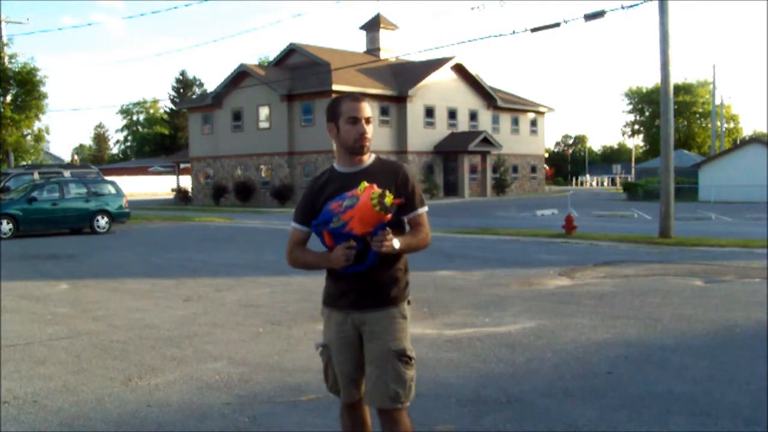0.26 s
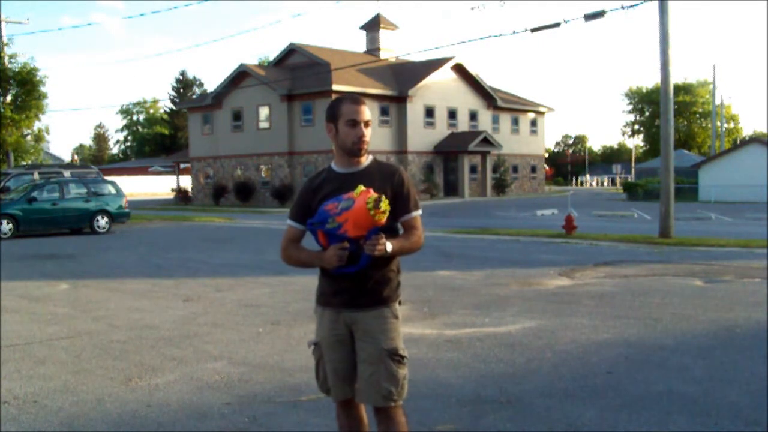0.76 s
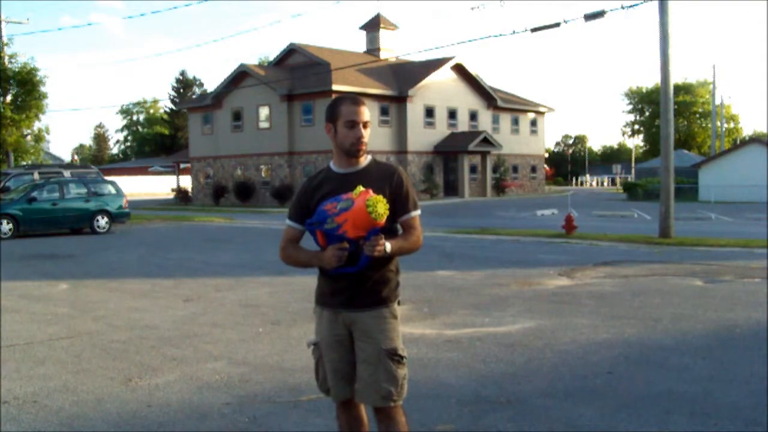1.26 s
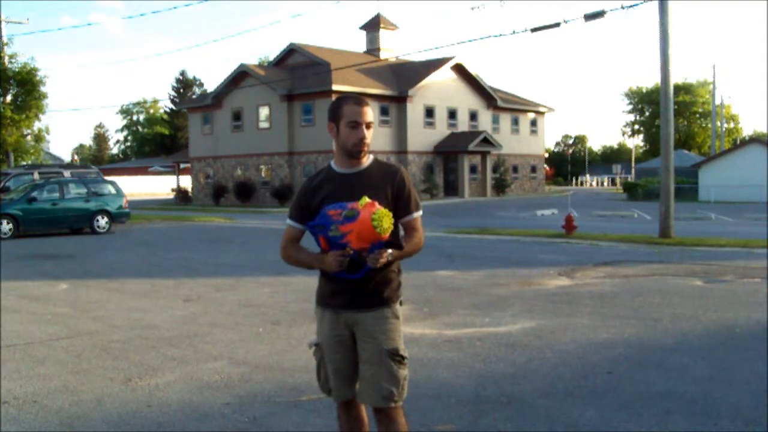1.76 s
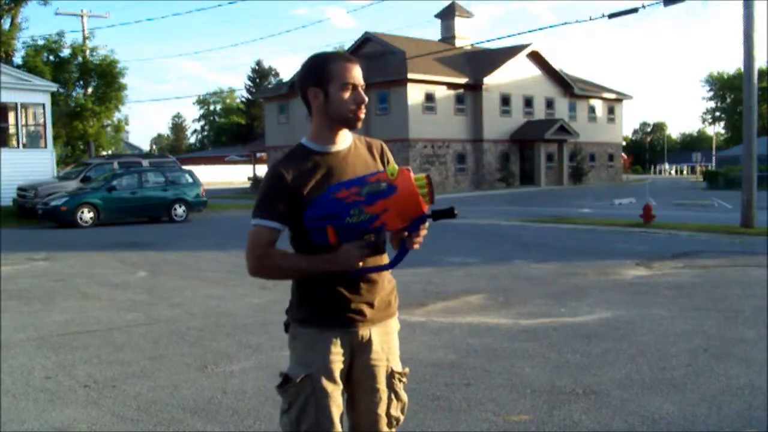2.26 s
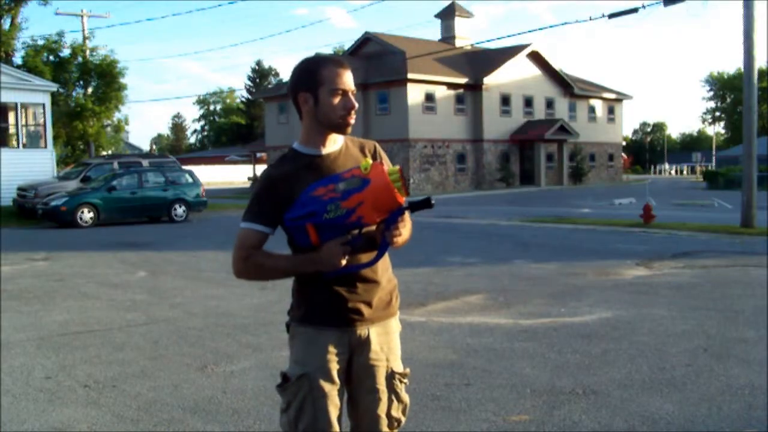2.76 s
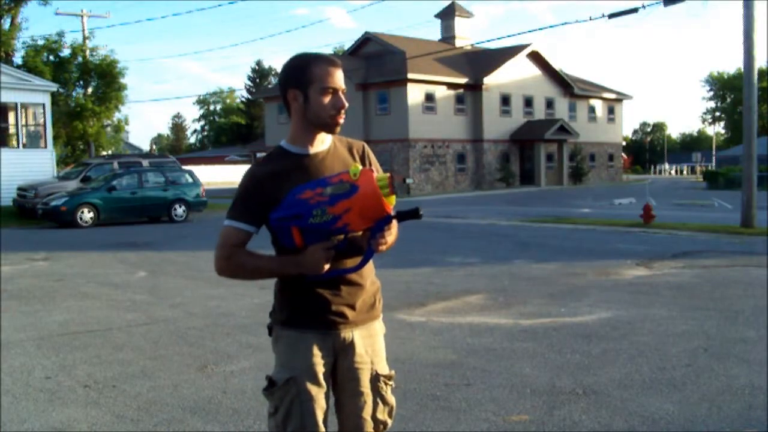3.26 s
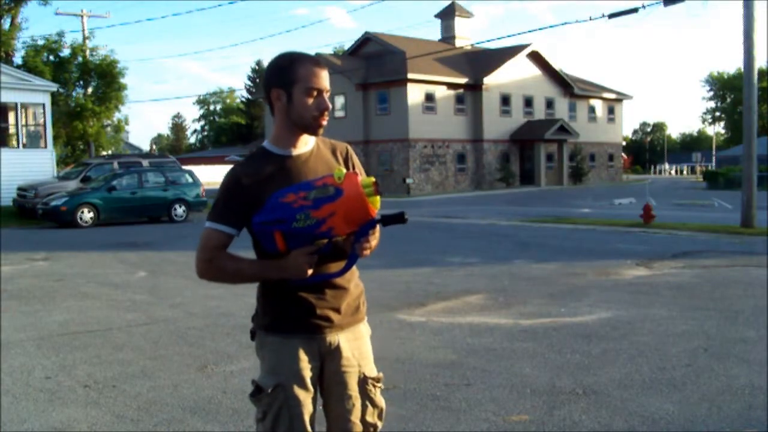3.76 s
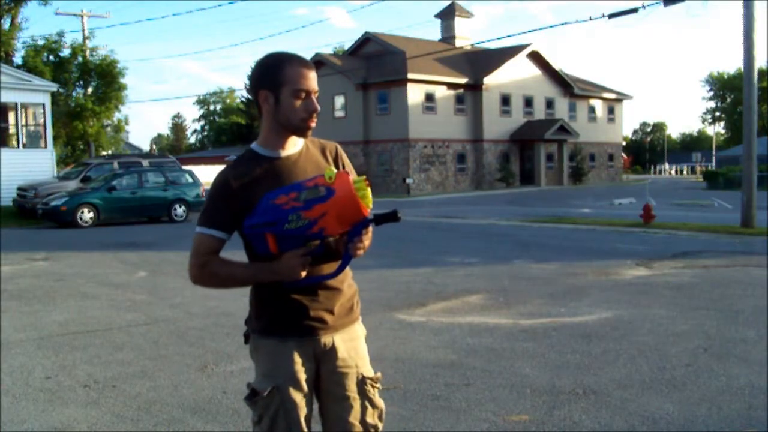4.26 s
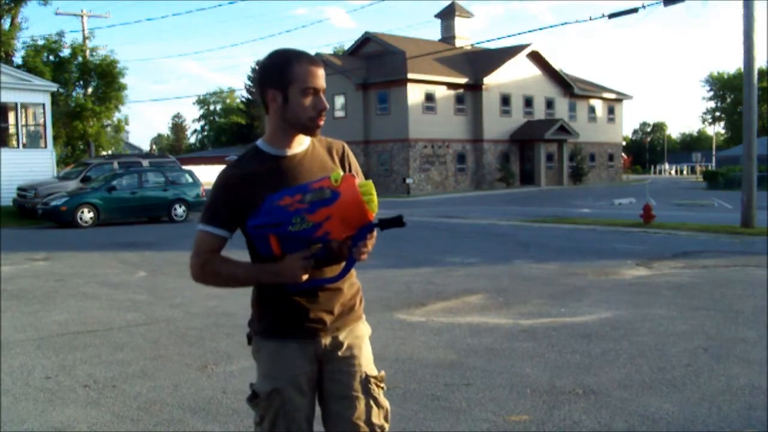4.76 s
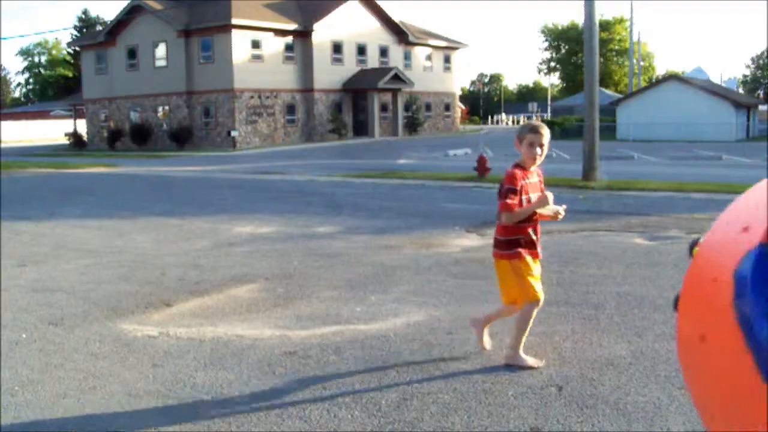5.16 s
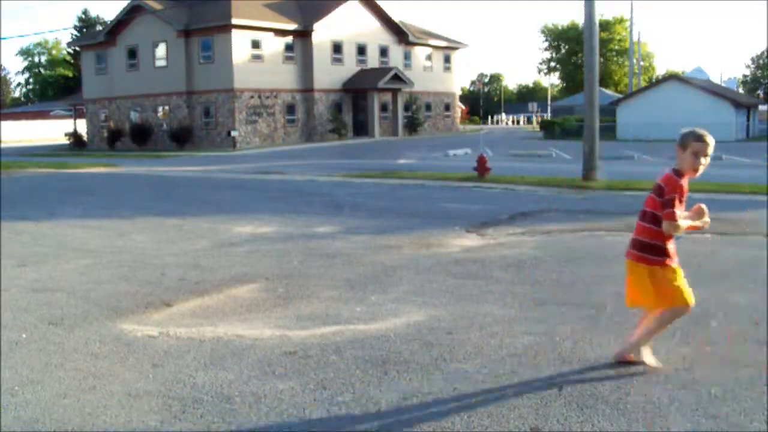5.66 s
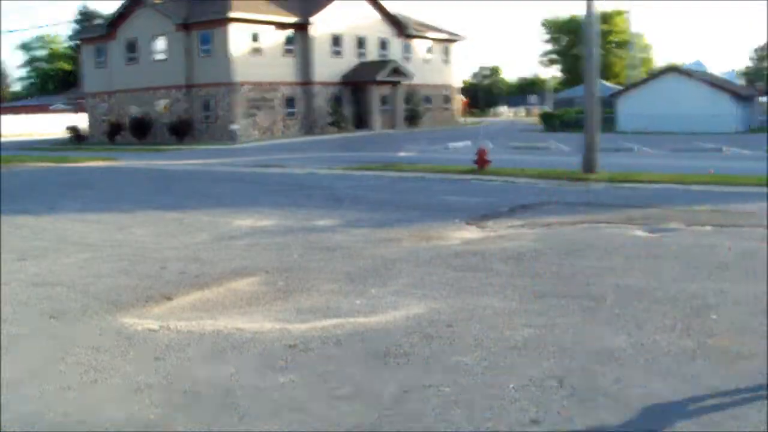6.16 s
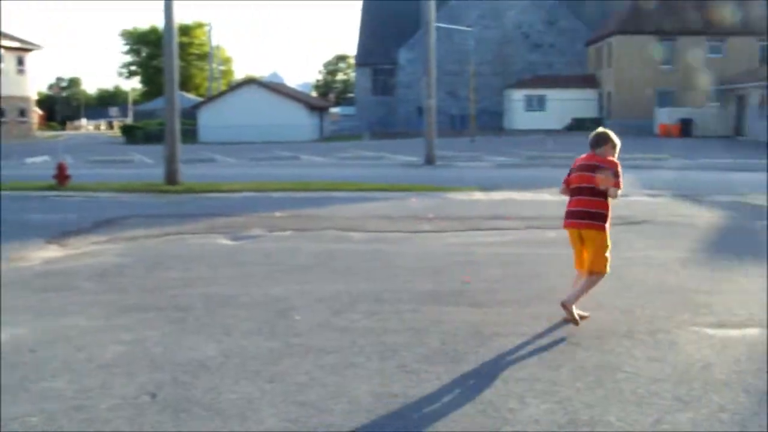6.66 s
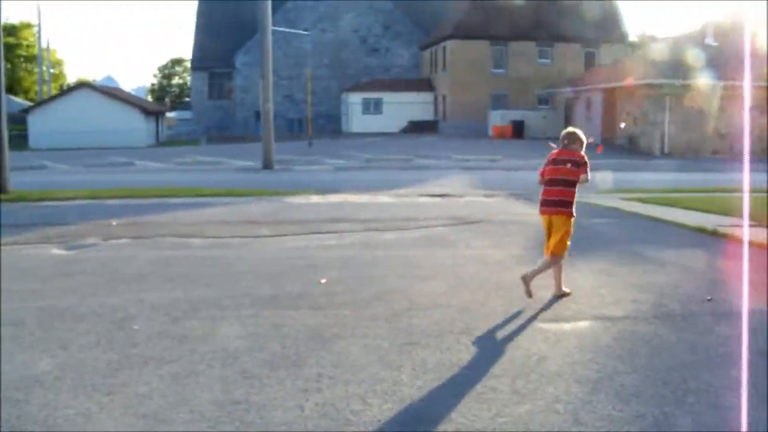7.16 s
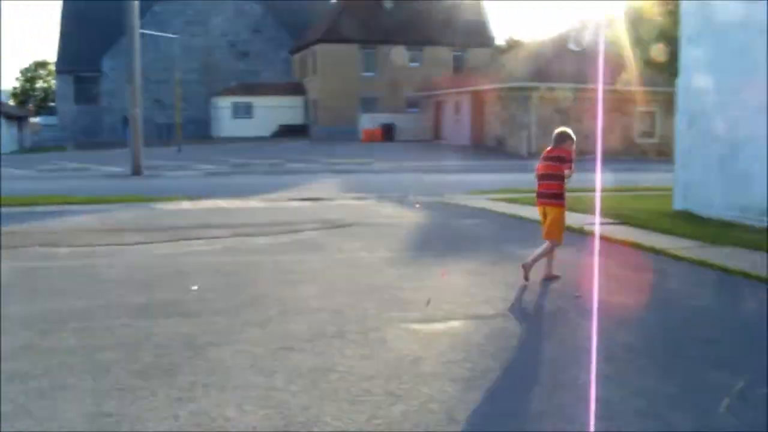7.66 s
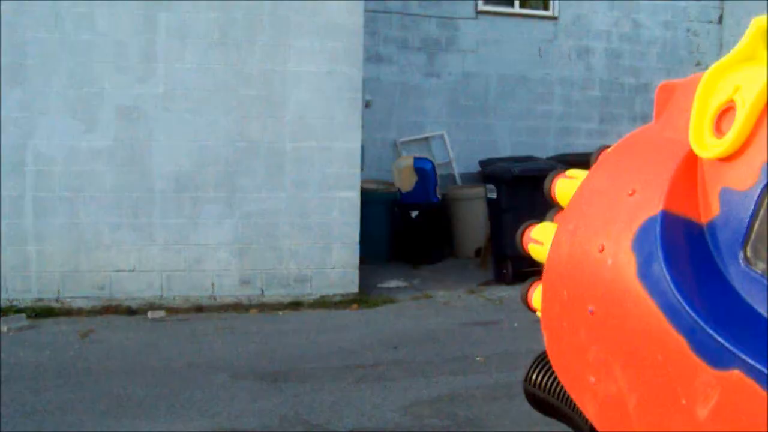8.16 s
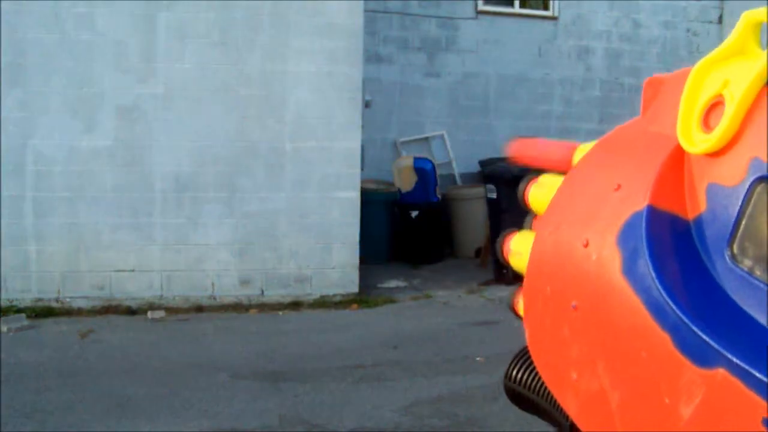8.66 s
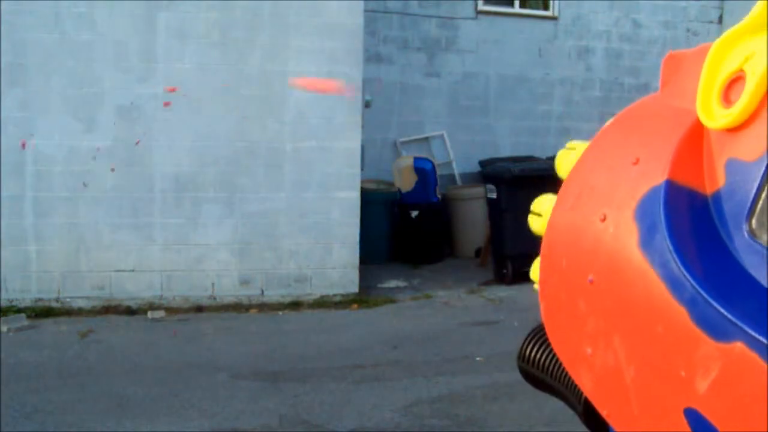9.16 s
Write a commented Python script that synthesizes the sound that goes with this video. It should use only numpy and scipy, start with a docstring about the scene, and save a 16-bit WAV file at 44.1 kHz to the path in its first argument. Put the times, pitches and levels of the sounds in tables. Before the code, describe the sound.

Outdoors in a parking lot, a motorized toy dart blaster starts almost at once with a click and a long rattling burst of about twenty shots until 1.4 s, slowing from roughly nineteen to fourteen per second. Each shot is a plastic slam, hollow barrel pop and latch clack. Echoes fade with a sharp tap at 1.6 s. At 2.1 s the position jumps closer; fifteen shots run from 2.6 to 3.4 s, then taps, three shots at 4.0 and two at 4.4 s. From 5.1 s the blaster is beside the microphone: short bursts at 5.7, 6.7 and 7.7 s, with low thumps, scuffs and ticks between, while a distant engine hum rises in pitch. At 8.2 s the view cuts to a wall and the hum drops; a final fourteen-shot burst from 8.65 to 9.35 s slaps back quickly. Air hiss throughout; loud shots distort on the small microphone.

```python
"""A motorized toy dart blaster fires eight rattling bursts in a parking lot, heard from four positions in turn.
Each shot is a slam of plastic parts, a hollow pop from the barrel, then a latch clack; the rate sags as a burst goes on.
Shaped noise makes the impacts: knocks through resonances of shell, latch and linkage, with taps of landing darts
and scuffs of hands. Scattered echoes and a facade slap return the clatter; wavering tones make a far engine's hum
under a hiss of air, and the small microphone overloads."""
import sys
import numpy as np
from scipy import signal
from scipy.fft import rfft, irfft, next_fast_len
from scipy.io import wavfile
from scipy.ndimage import uniform_filter1d

SR = 44100
rng = np.random.default_rng(int(sys.argv[2]) if len(sys.argv) > 2 else 0)


def generate_wav(signal):
    """Clip the signal to [-1, 1] and save it as 16-bit WAV at the path in sys.argv[1]."""
    frames = np.transpose(np.atleast_2d(signal))
    scaled = np.clip(frames, -1, 1) * 32767
    pcm = np.round(scaled).astype(np.int16)
    wavfile.write(sys.argv[1], SR, pcm)


N = 414540
HZ = np.fft.rfftfreq(8192, 1 / SR)
TIME = np.arange(N) / SR

# start of each listening position, then the end: [start_s]
POSITION_STARTS = [0, 2.13, 5.07, 8.205, 9.5]
# one row a pull of the trigger; the gap between shots grows as the motor sags, early (bend under 1) or late (over 1):
# [first_shot_s, shots, first_gap_s, last_gap_s, bend, relative force_db, clatter_s, latch_delay_s, relative latch_db]
TRIGGER_PULLS = [(0.06, 21, 0.053, 0.074, 1.3, -1.5, 0.024, 0.041, -3.5),
                 (2.594, 15, 0.0508, 0.0638, 1.15, -1.3, 0.022, 0.038, -5.5),
                 (3.977, 3, 0.064, 0.069, 1, -3, 0.026, 0.041, -5),
                 (4.43, 2, 0.073, 0.073, 1, -1.5, 0.024, 0.04, -7),
                 (5.662, 8, 0.0442, 0.055, 0.8, -4.5, 0.028, 0.039, -9),
                 (6.659, 9, 0.0505, 0.0635, 0.8, -5.5, 0.029, 0.039, -3),
                 (7.667, 5, 0.0585, 0.0718, 1, -7.5, 0.031, 0.041, -3),
                 (8.644, 14, 0.042, 0.0613, 0.42, -4.5, 0.032, 0.037, -1)]


def gain_of(db):
    """Decibels to an amplitude factor."""
    return 10 ** (np.asarray(db) / 20)


def evened(x):
    """Scales to rms 1."""
    return x / np.sqrt(np.mean(x ** 2) + 1e-20)


def read(points, hz):
    """Reads a table on a log-frequency axis."""
    f, value = np.transpose(points)
    return np.interp(np.log(hz + 1), np.log(f + 1), value)


def add(mix, s, sound):
    """Adds a sound at time s."""
    part = mix[..., max(round(s * SR), 0):][..., :sound.shape[-1]]
    part += sound[..., :part.shape[-1]]


def panned(db):
    """Left and right gains for a level difference; positive leans left."""
    return gain_of(np.array([[db], [-db]]) / 2)


def bumps(modes):
    """The dB curve of a set of resonances or dips."""
    return sum(db / (1 + (2 * (HZ - hz) / width) ** 2) for hz, width, db in modes)


def ring(db):
    """Minimum-phase impulse response with this dB curve: the energy comes first, then rings out."""
    log_gain = np.log(gain_of(np.maximum(db, -100)))
    circle = np.r_[log_gain, log_gain[-2:0:-1]]
    return np.fft.ifft(np.exp(np.conj(signal.hilbert(circle)))).real[:4096]


def colour(x, db):
    """Filters both channels by a dB curve, keeping the power of white noise."""
    response = ring(db)
    kernel = response / np.linalg.norm(response)
    return signal.oaconvolve(x, kernel[None], axes=1)[:, :x.shape[1]]


def low_pass(x, hz, size):
    """Steep linear-phase band limit."""
    kernel = signal.firwin(size, hz, window=("kaiser", 8), fs=SR)
    return signal.oaconvolve(x, kernel[None], "same")


def strike(t, rise, decay):
    """Envelope of a small impact: a quick rise and an exponential decay."""
    return (1 - np.exp(-t / rise)) * np.exp(-t / decay)


def clatter(size, per_s, air):
    """Dense random knocks of loose plastic in a rush of air."""
    knocks = rng.standard_normal((2, size)) * (rng.random(size) < per_s / SR)
    return evened(evened(knocks) + air * rng.standard_normal((2, size)))


def wavering_band(centre_hz, width_hz, side=0.33):
    """Slow random strength and phase turn a tone into a narrow stereo band."""
    coarse = TIME[::64]
    wander = rng.standard_normal((2, len(coarse), 2)) @ [1, 1j]
    r = np.exp(-np.pi * width_hz * coarse[1])
    for _ in range(2):
        wander = signal.lfilter([1 - r], [1, -r], wander)
    turn = np.exp(2j * np.pi * np.cumsum(centre_hz * np.ones(N)) / SR)
    mid, wide = ((np.interp(TIME, coarse, part) * turn).real for part in wander)
    return evened(np.array([mid + side * wide, mid - side * wide]))


def engine(hum_db=-3, hum_width_hz=10, muffler_hz=215, roar_db=-5, roar_hz=115, roar_width_hz=90,
           rumble_db=1, rumble_hz=45, rumble_width_hz=18, rumble_pan_db=5):
    """A far engine drifts in pitch: a few wavering tones over a low roar and a deep rumble."""
    # the engine idles, later speeds up, then drops back: [time_s, pitch_hz]
    engine_pitch = [(0, 99.45), (2.2, 98.8), (3.3, 106.7), (3.9, 113), (4.4, 106), (4.9, 90.4),
                    (5.2, 96.96), (5.6, 103), (6.5, 130.9), (7.3, 153.9), (7.6, 160), (8.19, 193.4),
                    (8.23, 105), (9.4, 102)]
    # its tones: [multiple of the pitch, relative level_db]
    engine_tones = [(1, -0.5), (1.5, -3.5), (2, -9.5)]
    # one row a listening position, relative: [hum_db, roar_db, rumble_db]
    background = [(-62, -61.5, -68.5), (-40, -42, -57), (-36.5, -37.5, -33.5), (-55, -54.5, -43)]
    pitch_hz = np.interp(TIME, *np.transpose(engine_pitch))
    position = np.digitize(TIME, POSITION_STARTS) - 1
    hum_level_db, roar_level_db, rumble_level_db = np.array(background)[position].T

    def muffled(tone_hz, order=6):
        """The muffler and the distance pass only the low tones."""
        return 1 / np.sqrt(1 + (tone_hz / muffler_hz) ** (2 * order))

    hum = 0
    for multiple, tone_db in engine_tones:
        tone_hz = multiple * pitch_hz
        hum = hum + gain_of(tone_db) * muffled(tone_hz) * wavering_band(tone_hz, hum_width_hz)
    roar = wavering_band(roar_hz, roar_width_hz)
    rumble = panned(rumble_pan_db) * wavering_band(rumble_hz, rumble_width_hz)
    return (gain_of(hum_level_db + hum_db) * hum + gain_of(roar_level_db + roar_db) * roar
            + gain_of(rumble_level_db + rumble_db) * rumble)


def outdoor_air(level_db=-52.5, shared=1.028):
    """Steady outdoor noise, partly common to both channels."""
    # [frequency_hz, relative density_db per Hz]
    air_spectrum = [(15, -33), (25, -4.5), (81, 5), (178, -5), (243, -1.5), (301, -12.5), (463, -8),
                    (822, -11.5), (971, -11), (1330, -14), (6130, -25.5), (7600, -32.5), (9880, -77.5),
                    (16700, -120)]
    noise = rng.standard_normal((2, N)) + shared * rng.standard_normal(N)
    return gain_of(level_db) * colour(noise, read(air_spectrum, HZ)) / np.sqrt(2)


def clacks(level_db=-4.5, rise=0.00076, decay=0.0033077, tail_db=-17, tail_decay=0.014838,
           slack_lead_s=0.013, slack_decay_s=0.0094):
    """The linkage clicks as it takes up its slack, then snaps with a weaker rattle behind."""
    # trigger and mechanism: [snap_s, relative level_db, slack click_db relative to the snap]
    clack_events = [(0.03, 2.5, -15), (2.561, 5.5, -17.5), (3.929, 3, -16.5), (4.381, 2.5, -13.5),
                    (5.533, -12.5, -37.5), (5.596, -12.5, -32), (7.634, -17, -21), (8.565, -14.5, -39.5),
                    (8.604, -16.5, -42)]
    # ring of the trigger linkage: [frequency_hz, width_hz, lift_db]
    linkage_modes = [(699, 370, 4.5), (1573.3, 200, 2.5), (2522, 300, 3), (3189, 610, 4)]
    t, envelope = np.arange(SR // 8) / SR, np.zeros(N)
    for s, db, slack_db in clack_events:
        gain = gain_of(db + level_db)
        rattle = gain_of(tail_db) * strike(t, decay, tail_decay)
        add(envelope, s - slack_lead_s, gain * gain_of(slack_db) * strike(t, rise, slack_decay_s))
        add(envelope, s, gain * (strike(t, rise, decay) + rattle))
    return colour(envelope * rng.standard_normal((2, N)), bumps(linkage_modes))


def run_up(length_s=0.0086, level_db=-22):
    """The gears start to turn just before the first shot: a short swell of rattle."""
    envelope = np.zeros(N)
    swell = gain_of(level_db) * np.linspace(0, 1, round(length_s * SR))
    for start, *_ in TRIGGER_PULLS:
        add(envelope, start - length_s, swell)
    return envelope * clatter(N, per_s=2000, air=0.6)


def firing(first_shot_db=-1.5, build_up_shots=0.9, force_spread_db=0.9338, length_spread=0.11,
           latch_spread_s=0.003, latch_spread_db=2.5):
    """Yields every shot as (s, force dB, clatter s, latch delay s, latch dB); force builds, chance varies each."""
    for start, count, first_gap, last_gap, bend, force_db, length, delay, catch_db in TRIGGER_PULLS:
        sag = np.linspace(0, 1, round(count) - 1) ** bend
        gaps = first_gap + (last_gap - first_gap) * sag
        for k, s in enumerate(start + np.r_[0, np.cumsum(gaps)]):
            force, stretch, late, catch = rng.standard_normal(4)
            build_up_db = first_shot_db * np.exp(-k / build_up_shots)
            yield (s, force_db + build_up_db + force_spread_db * force,
                   length * np.exp(length_spread * stretch),
                   delay + latch_spread_s * late,
                   catch_db + latch_spread_db * catch)


def shots(fired, slam_db=2, rise=0.005938, hold=0.73635, decay=0.01054, gear_db=-18, gear_decay=0.052345,
          latch_db=-3, latch_decay=0.0073325, bounce_db=-10, bounce_lead=.008, shot_tone_hz=2600, shot_tone_db=4):
    """The piston slams and rattles the shell, the gears grind on, then the latch bounces and catches."""
    # ring of the latch: [frequency_hz, width_hz, lift_db]
    latch_modes = [(634.26, 1300, 11.5), (1618.2, 260, 14), (2670.9, 480, 4.5), (3150, 450, 5.5)]
    t = np.arange(SR // 6) / SR
    slam, latch = np.zeros((2, N)), np.zeros(N)
    chances = rng.standard_normal((len(fired), 3))
    for (s, force_db, length, delay, catch_db), (early, size, tone) in zip(fired, chances):
        fall = np.exp(-np.maximum(t - .002 - hold * length, 0) / decay)
        blow = np.minimum(t / rise, 1) ** 2 * fall
        gears = gain_of(gear_db) * strike(t, rise, gear_decay) * clatter(len(t), per_s=700, air=.5)
        since_bounce = np.maximum(t - delay + bounce_lead / 2 + 0.0029 * early, 0)
        bounce = gain_of(bounce_db + 2.4 * size) * strike(since_bounce, 0.00023, 0.00048)
        impacts = gain_of(force_db + slam_db) * blow + bounce
        rattle = impacts * clatter(len(t), per_s=1600, air=0.8139) + gears
        hz = shot_tone_hz * np.exp(.5 * tone)  # every shot's rattle rings with its own colour
        add(slam, s - .004, colour(rattle, bumps([(hz, 0.35 * hz, shot_tone_db)])))
        add(latch, s + delay, gain_of(catch_db + latch_db) * strike(t, 0.0041, latch_decay))
    return slam + colour(latch * clatter(N, per_s=2500, air=0.11), bumps(latch_modes))


def barrels(fired, level_db=-13.0, delay=0.019, rise=0.0024, decay=0.00888):
    """The hollow pop of each dart leaving its barrel: a noise burst through the tube's resonances."""
    # [frequency_hz, width_hz, lift_db]
    barrel_modes = [(470, 160, 11), (700, 330, 23)]
    # relative strength of the pop at each listening position: [level_db]
    muzzle_db = [-1.5, -1.5, 2.5, 4]
    t, envelope = np.arange(SR // 12) / SR, np.zeros(N)
    for s, force_db, *_ in fired:
        position_db = muzzle_db[np.digitize(s, POSITION_STARTS) - 1]
        add(envelope, s + delay, gain_of(force_db + level_db + position_db) * strike(t, rise, decay))
    return colour(envelope * rng.standard_normal((2, N)), bumps(barrel_modes))


def lot(x, clump_db=5.0):
    """Scattered echoes arrive in clumps from pavement and buildings; the treble dies first."""
    # [delay_s, relative level_db]
    echo_levels = [(0.01, 5), (0.04, -8), (0.09, -10), (0.15, -11.5), (0.2, -14.5), (0.3, -13), (0.45, -21),
                   (0.7, -25.5), (1.1, -53)]
    # extra decay by band: [frequency_hz, loss_db per s]
    echo_loss = [(150, 10.5), (600, -1), (1500, 13.5), (4000, 24), (7500, 48.5)]
    size = SR * 6 // 5
    reflections = rng.standard_normal((2, size)) * (rng.random((2, size)) < 2500 / SR)
    hz, t, z = signal.stft(reflections, SR, nperseg=256)
    clumps = evened(uniform_filter1d(rng.standard_normal(len(t)), size=4))
    level_db = np.interp(t, *np.transpose(echo_levels)) + clump_db * clumps
    z *= gain_of(level_db - t * read(echo_loss, hz)[:, None]) * (t > .005)
    tail = signal.istft(z, SR, nperseg=256)[1]
    tail /= np.linalg.norm(tail, axis=1, keepdims=True)
    return signal.oaconvolve(x, tail, axes=1)[:, :x.shape[1]]


def slap(x, delay, dull_hz=3500):
    """One duller copy thrown back by a facade."""
    late = np.pad(x, ((0, 0), (round(delay * SR), 0)))[:, :x.shape[1]]
    return signal.lfilter(*signal.butter(1, dull_hz, fs=SR), late)


def landings(fired, flight_s=0.2, flight_spread=0.35, level_db=-21, tone_hz=1000,
             spread_db=-1.5, spread_octaves=0.85):
    """Yields dart landings as (s, relative dB, tone Hz, left-right dB), if the position still holds."""
    chances = (rng.random((len(fired), 3)) - .5) * np.sqrt(12)  # uniform, deviation 1
    for (s, *_), (flight, size, tone) in zip(fired, chances):
        lands = s + flight_s * np.exp(flight_spread * flight)
        if np.digitize(lands, POSITION_STARTS) == np.digitize(s, POSITION_STARTS):
            yield lands, level_db + spread_db * size, tone_hz * 2 ** (spread_octaves * tone), 0


def taps(fired, level_db=3, cycles=4, tail_db=-19, tail_decay=0.014, lift_db=10, width=0.36, apart=1.0):
    """Small knocks, each with its own tone; the lower ones last longer."""
    # clearest taps of landing darts and handled plastic: [time_s, relative level_db, tone_hz, left_right_db]
    clear_taps = [(1.603, -3, 5238, 6), (1.742, -20, 5122, -4), (1.845, -29.5, 1047, 4),
                  (3.523, -11, 4935, -3), (3.572, -14.5, 2794, -2.5), (3.662, -16.5, 3086, 16.5),
                  (3.726, -19.5, 3003, 19.5), (3.837, -20, 801, 7), (3.858, -19.5, 1450, 7),
                  (4.248, -25.5, 651, -1.5), (4.292, -19, 1672, 2.5), (4.832, -24, 2602, 11.5),
                  (5.086, -24.5, 1759, 12.5), (6.171, -8.5, 3511, 9), (6.266, -16, 2699, -2),
                  (6.297, -19, 2598, 18), (6.404, -23, 2891, 14), (6.466, -19, 3680, 7.5),
                  (6.521, -20, 3267, 6.5), (6.572, -13, 3503, 5.5), (7.341, -16, 3006, 12.5),
                  (7.392, -18.5, 1201, -1.5), (7.415, -18.5, 4016, 2.5), (7.523, -24, 1179, 10.5),
                  (7.572, -23, 1410, 4), (8.096, -19.5, 3078, 12.5), (8.131, -18.5, 1920, 8)]
    t, out = np.arange(SR // 12) / SR, np.zeros((2, N))
    body_db = read([(100, -3), (450, 3.5), (3000, 5), (7000, 0.5), (9000, -16.0)], HZ)
    for s, db, hz, pan_db in [*clear_taps, *landings(fired)]:
        tail = gain_of(tail_db) * strike(t, 0.0094, tail_decay)
        envelope = strike(t, 0.0004353, cycles / (hz + 1500)) + tail
        grain = evened(rng.standard_normal(len(t)) + apart * rng.standard_normal((2, len(t))))
        knock = colour(envelope * grain, bumps([(hz, width * hz, lift_db)]) + body_db)
        add(out, s, gain_of(db + level_db) * panned(pan_db) * knock)
    return out


def handling(rub=0.35, lift_db=7, width=0.8, tick_decay=0.001732, ticks_per_s=130, pan_db=8):
    """Hands shift the blaster and rub its shell: a swell of soft friction dotted with small ticks."""
    # [start_s, length_s, relative level_db, tone_hz]
    scuffs = [(1.809, 0.07068, -37.5, 1057), (1.955, 0.1358, -38, 1100), (5.419, 0.08467, -40, 2561),
              (6.097, 0.30256, -28, 2669), (6.381, 0.4081, -39.5, 3294), (7.27, 0.26206, -29.5, 2230),
              (7.503, 0.2294, -39.5, 1311), (8.09, 0.11, -28, 1800)]
    out = np.zeros((2, N))
    body_db = read([(150, -5.5), (500, 3), (3000, 1), (7000, -2.5), (8500, -23)], HZ)
    for s, length, db, hz in scuffs:
        size = round(length * SR)
        slips = rng.exponential(1, size) * (rng.random(size) < ticks_per_s / SR)
        ticks = evened(signal.lfilter([1], [1, -np.exp(-1 / (tick_decay * SR))], slips))
        friction = evened(rng.standard_normal(size) + rng.standard_normal((2, size)))
        scuff = np.hanning(size) ** .5 * (rub + ticks) * friction
        tone_db = bumps([(hz, width * hz, lift_db)]) + body_db
        add(out, s, gain_of(db - 8) * panned(pan_db) * colour(scuff, tone_db))
    return out


def thumps(level_db=-2, rise=0.0028, decay=0.02526):
    """The lowest mode of the shell thumps as the drive takes up its load: a decaying sine."""
    # [start_s, pitch_hz, relative level_db]
    shell_thumps = [(5.663, 205.5, -28.5), (6.659, 211.1, -14.5), (7.671, 223.9, -14.5),
                    (8.645, 192.8, -13.5)]
    t, out = np.arange(SR // 4) / SR, np.zeros(N)
    for s, hz, db in shell_thumps:
        add(out, s, gain_of(db + level_db) * strike(t, rise, decay) * np.sin(2 * np.pi * hz * t))
    return out


def ports(x, likeness, lead, balance):
    """Turns two unrelated signals into what the two microphone ports hear."""
    size = next_fast_len(x.shape[1] + 4096)
    a, b = rfft(x, size)
    hz = np.fft.rfftfreq(size, 1 / SR)
    same, tilt_db = np.clip(read(likeness, hz), 0, 1), read(balance, hz) / 2
    right = (same * a + np.sqrt(1 - same ** 2) * b) * np.exp(-1j * read(lead, hz))
    return irfft(np.array([a * gain_of(tilt_db), right * gain_of(-tilt_db)]), size)[:, :x.shape[1]]


def scene():
    """The blaster, its echoes and the air at each listening position in turn, over the other sounds."""
    # one row a position, levels relative: [direct_db, echo_db, air_db, facade slap_delay_s, slap_db, left_right_db]
    places = [(-4, 4, 5, .19, -48, 2), (-3.5, 3.5, 6, 0.41, -53, 2.5), (0, 2, 7.5, 0.16, -24, -4),
              (2, 3.5, 5.5, 0.05, -7, 1.5)]
    # the blaster's colour from each position: [frequency_hz, relative density_db per Hz]
    far_spectrum = [(71, -35), (120, -26), (232, -14.5), (301, -7.5), (384, -3.5), (516, -6.5),
                    (613, -11.5), (853, -1.5), (980, -7), (1440, -2.5), (2140, -4.5), (2460, -2.5),
                    (6970, -3), (7600, -3.5), (9880, -44.5), (16700, -120)]
    front_spectrum = [(71, -40), (120, -29), (291, -1), (377, -0.5), (572, -6.5), (646, -2.5), (980, -4),
                      (1410, 1), (1740, -2), (2500, 0.5), (3140, -1), (3730, 0), (6390, -0.5), (7600, -3.5),
                      (9880, -57), (16700, -120)]
    held_spectrum = [(71, -30), (120, -19.5), (220, -9), (296, -2.5), (346, -8), (582, -7.5), (681, -3),
                     (853, -4), (963, -8.5), (1130, -3), (1270, -0.5), (1740, -4.5), (6500, -6),
                     (7600, -5.5), (9880, -44), (16700, -120)]
    wall_spectrum = [(71, -35), (120, -21.5), (232, -6.5), (291, -10), (346, -8.5), (525, -7), (582, -9.5),
                     (681, -3), (947, -6), (1270, -4), (2030, -5.5), (4840, -4), (6850, -5.5), (7600, -6),
                     (9880, -20), (16700, -120)]
    # stereo image, ahead of and beside the microphone; three tables each:
    # left-right likeness [frequency_hz, 0-1], lead of the left port [frequency_hz, radians], balance [frequency_hz, db]
    ahead = [
        [(60, .8), (350, .97), (800, .93), (1200, .7), (1600, .4), (2300, .5), (2900, .6), (3700, .9),
         (4300, .97), (7500, .96)],
        [(60, 0), (400, -.25), (1000, -.1), (1700, .8), (2400, .6), (3100, -.1), (7500, -.1)],
        [(60, 2.0), (100, 2.0), (170, 1.0), (300, 0.0), (510, 0.0), (860, 0.0), (1470, 0.5), (2510, 3.0),
         (4280, 1.0), (7300, -0.5)],
    ]
    beside = [
        [(150, 0.8442), (700, 0.7733), (1300, 1), (2700, 0.5999), (3500, 0.4842), (5000, 0.0767),
         (7500, 0.5668)],
        [(100, 0), (500, .4), (1000, 1.2), (1600, 2), (2800, 2.8), (3600, 3.4), (4200, 5.7), (5500, 6.1),
         (7500, 6.25)],
        [(60, -3.5), (100, 29), (170, -12.5), (300, -5.5), (510, -5.5), (860, -5), (1470, -1.5), (2510, 3),
         (4280, 3.5), (7300, 0.5)],
    ]
    # resonances of the hollow shell: [frequency_hz, width_hz, lift_db]
    shell_modes = [(342, 83, 5.5), (532.76, 27, 7), (651, 100, 4), (810, 70, 0.5), (1162, 81, 1),
                   (1462.4, 110, 1.5), (1828.8, 130, 3), (2470.1, 190, 3), (3760, 88, -0.5)]
    fired = list(firing())
    drive = shots(fired) + barrels(fired) + run_up() + clacks()
    air = outdoor_air()
    body_db = read([(60, -6.5), (200, -3), (400, 0), (1000, 2.0), (3000, 4.5), (7000, 1), (8500, -10)], HZ)
    shell_db = bumps(shell_modes) + body_db
    out = engine() + taps(fired) + handling() + thumps()
    spectra = (far_spectrum, front_spectrum, held_spectrum, wall_spectrum)
    views = zip(POSITION_STARTS, POSITION_STARTS[1:], places, spectra, (ahead, ahead, beside, beside))
    for start, end, (direct_db, echo_db, air_db, delay, slap_db, pan_db), spectrum, image in views:
        here = slice(round(start * SR), round(end * SR))
        blaster = colour(drive[:, here], read(spectrum, HZ) + shell_db)
        echoes = gain_of(echo_db - 18.0) * lot(blaster) + gain_of(slap_db) * slap(blaster, delay)
        direct = gain_of(direct_db) * ports(blaster, *image)
        add(out, start, panned(pan_db) * (direct + echoes) + gain_of(air_db) * air[:, here])
    return out


def record(dry, ceiling=0.72719, knee=7.7, makeup_db=2.5, top_knee=12):
    """The microphone stage overloads; the narrow-band result is notched and flattens once more at full scale."""
    # dips in the response: [frequency_hz, width_hz, depth_db]
    response_dips = [(301.99, 53.47, -15), (967.38, 27.464, -15.5)]
    # bass roll-off of the microphone: [frequency_hz, level_db]
    bass_rolloff = [(15, -7.5), (40, -6.5), (90, -1.5), (200, 0.5)]
    pressed = dry / (1 + abs(dry / ceiling) ** knee) ** (1 / knee)
    response = ring(bumps(response_dips) + read(bass_rolloff, HZ))
    notched = signal.oaconvolve(pressed, response[None], axes=1)[:, :N]
    narrow = gain_of(makeup_db) * low_pass(notched, 7650, size=201)
    flattened = narrow / (1 + abs(narrow) ** top_knee) ** (1 / top_knee)
    return low_pass(flattened, 15800, size=255)


dry = scene()
out = record(dry)
generate_wav(out)
```